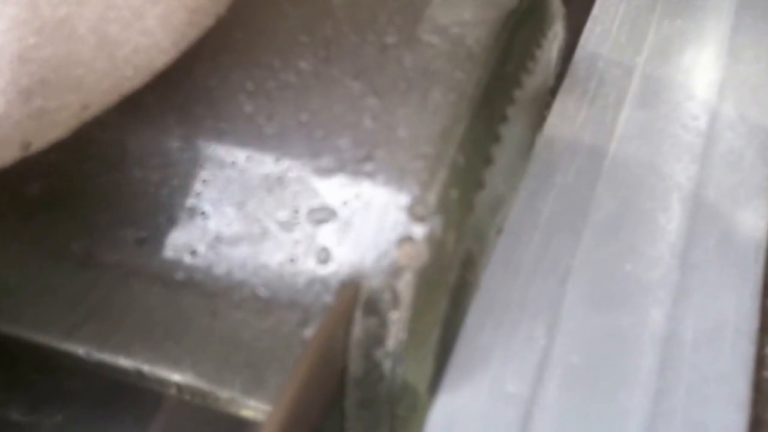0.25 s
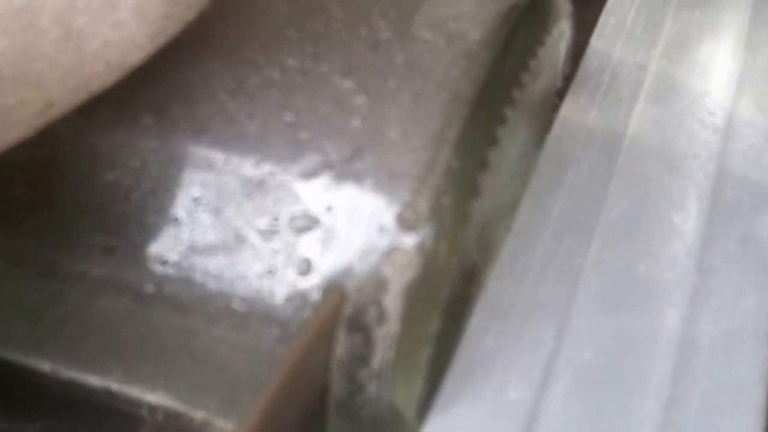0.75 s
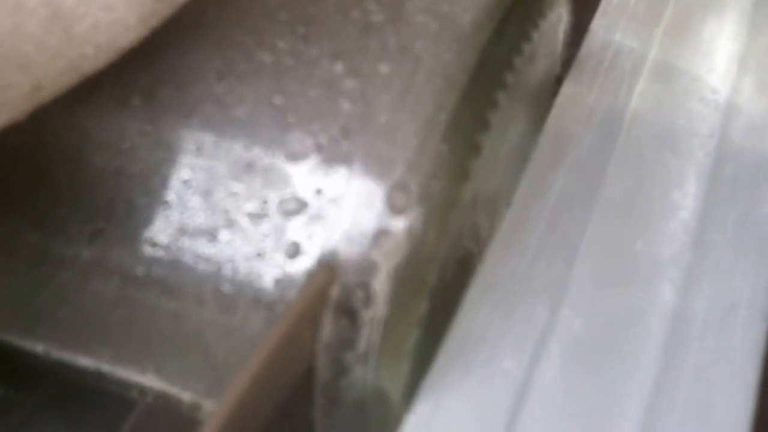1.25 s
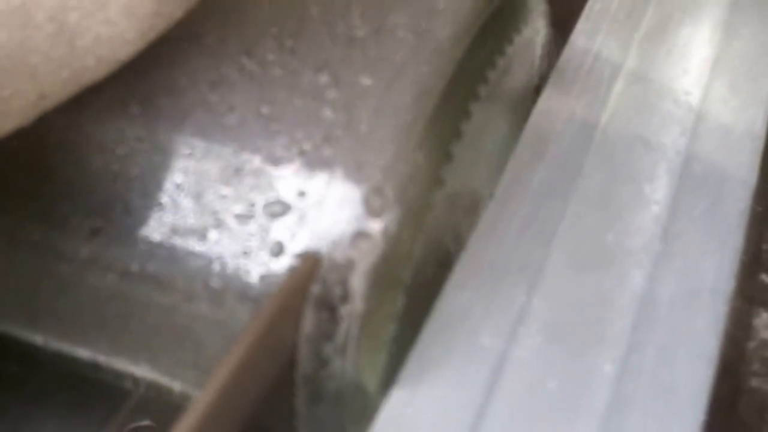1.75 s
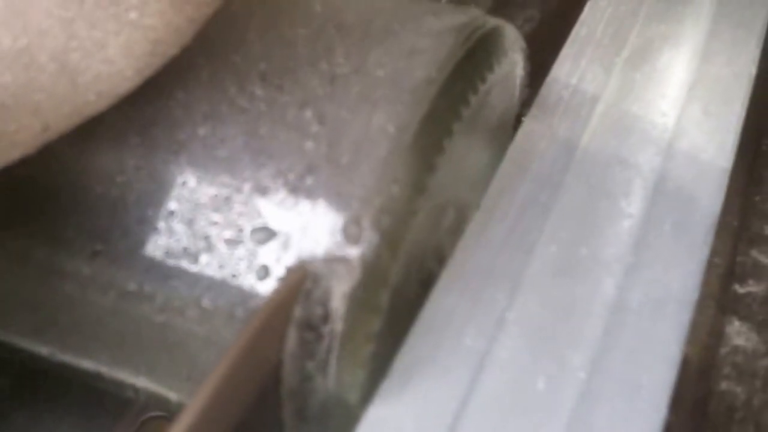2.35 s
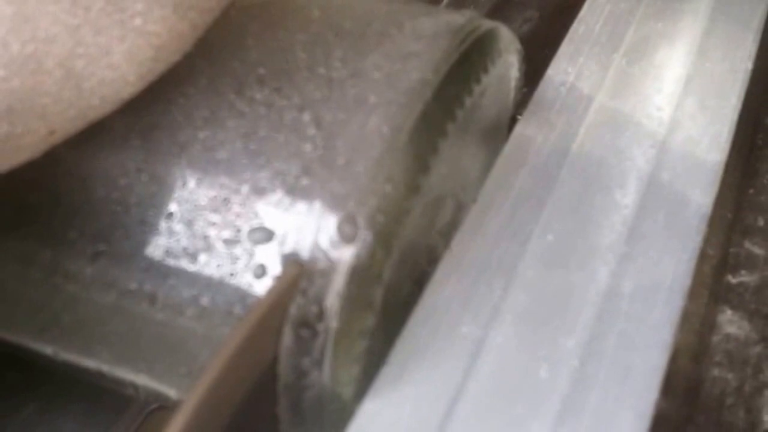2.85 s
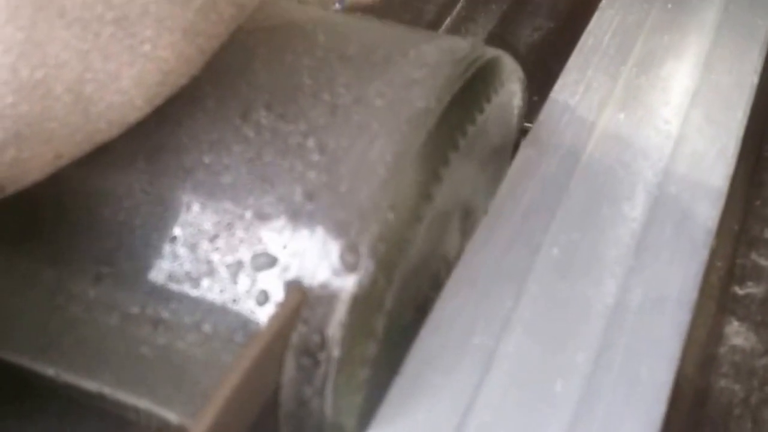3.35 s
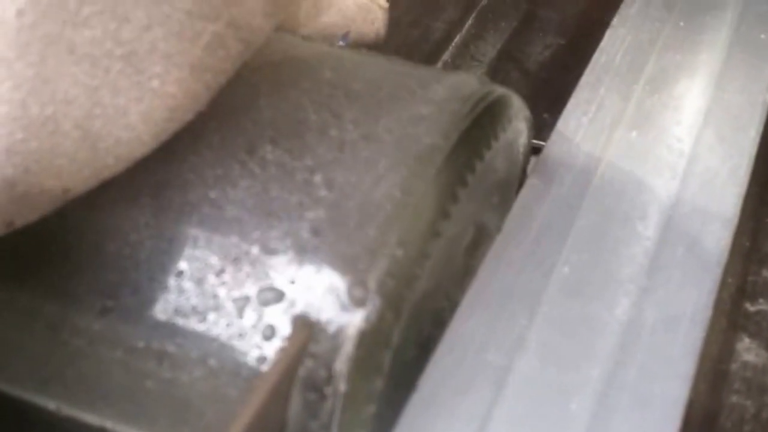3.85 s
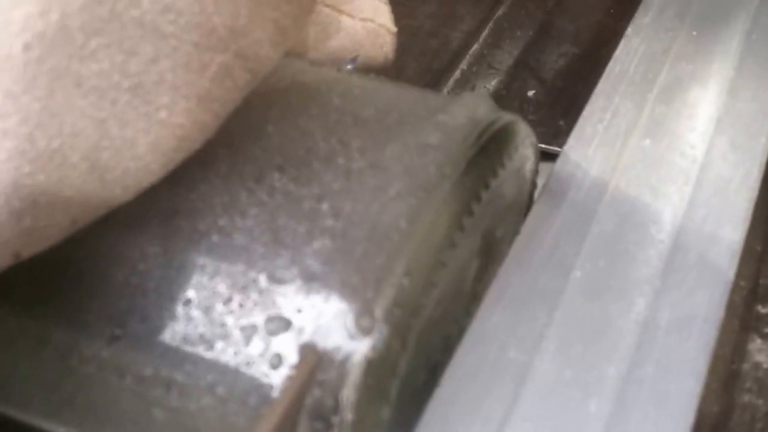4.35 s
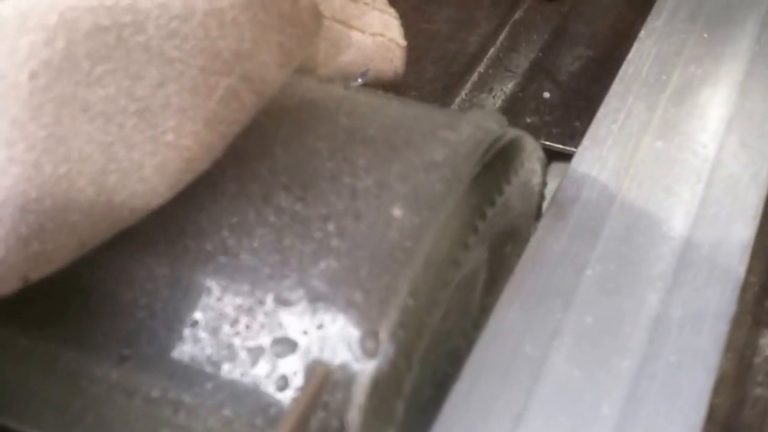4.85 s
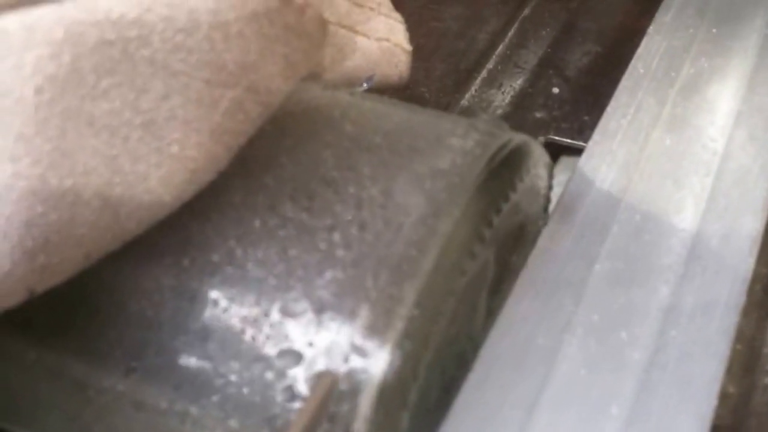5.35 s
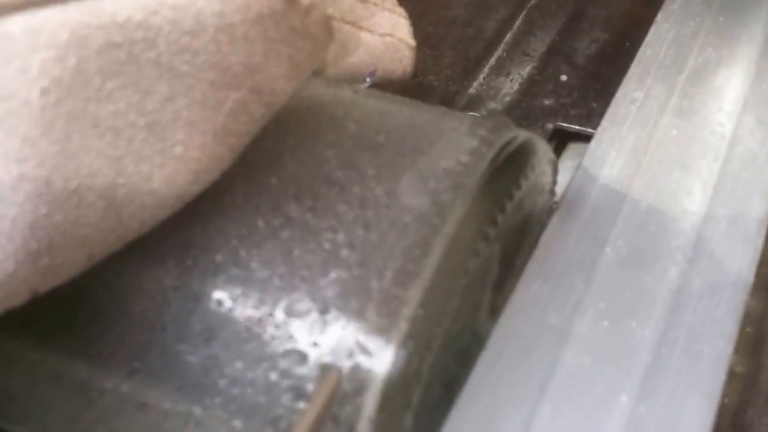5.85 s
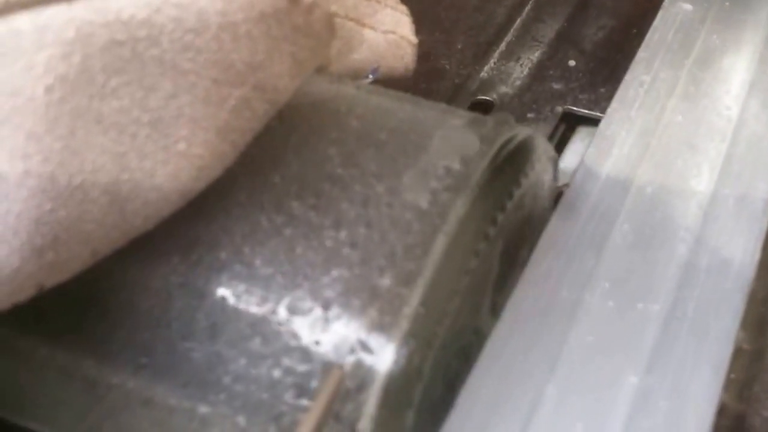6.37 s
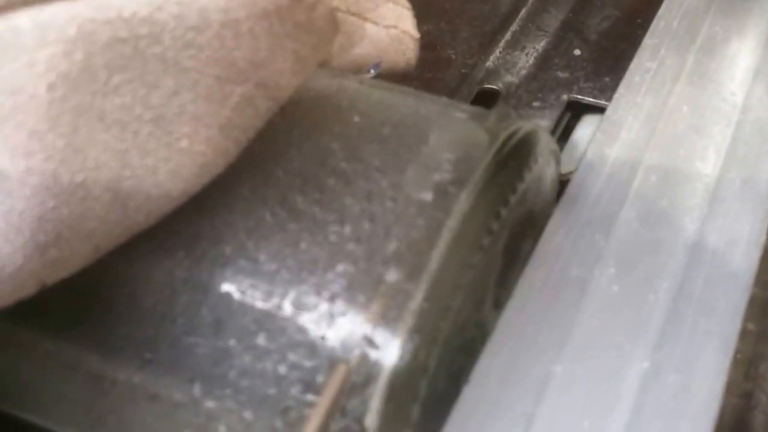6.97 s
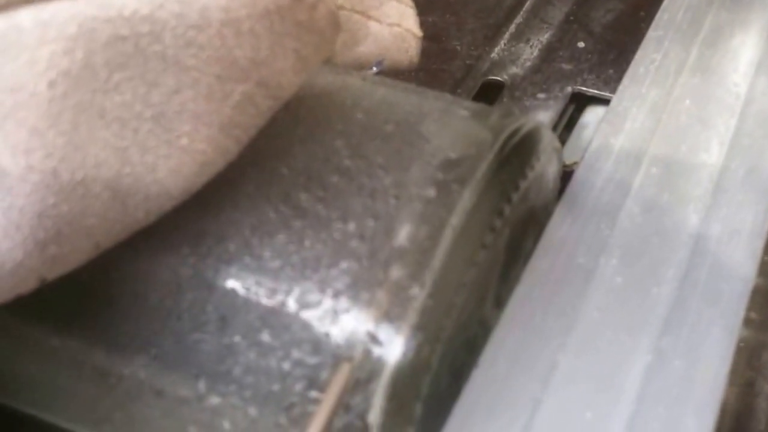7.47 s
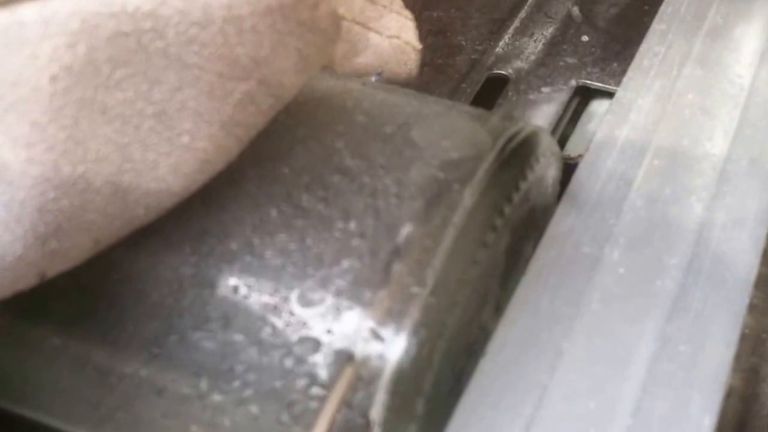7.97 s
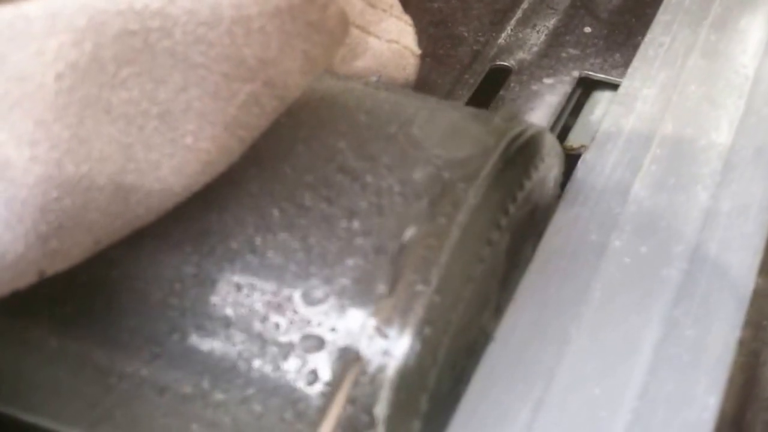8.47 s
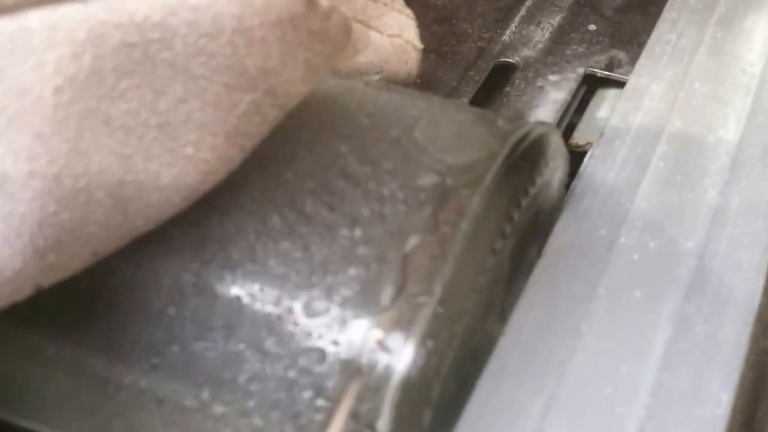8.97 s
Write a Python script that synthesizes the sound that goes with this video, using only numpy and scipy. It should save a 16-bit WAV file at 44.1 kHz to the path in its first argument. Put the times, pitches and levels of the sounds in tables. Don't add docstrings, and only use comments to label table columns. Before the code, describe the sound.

From 0 s a small wet saw is already grinding a glass bottle, very close, dry and mono, loud and slightly overdriven. The core is a harsh, rapidly buzzing grind repeating about sixty times a second, with glassy, metallic ringing strongest around 4-5 kHz and gritty hiss above. Thin steady whistles fade in and out, several in the first second. Irregular air gusts and short popping puffs strike the microphone, thickest before 2.5 s, returning around 3.4-4 s, then dying away. Around 3.5-5 s the whistles multiply and the grain becomes more regular. Near 5.3 s the grind eases slightly in level, and its buzz throbs more deeply and broadly. Brief bright surges come at about 6.35 and 6.7 s. From 6.8 to 8 s it whines on; at 8 s it brightens and pulses strongly, dulls near 8.65 s, and drops slightly after 9.1 s, still running. Faint low motor hum underlies everything.

```python
import sys
import numpy as np
from scipy import signal
from scipy.fft import rfft, irfft, next_fast_len
from scipy.io import wavfile
from scipy.ndimage import uniform_filter1d, map_coordinates

SR = 44100
rng = np.random.default_rng(int(sys.argv[2]) if len(sys.argv) > 2 else 0)


def transcribe(signal):
    frames = np.atleast_2d(signal).T
    limited = np.clip(frames, -1, 1)
    pcm = np.round(limited * 32767).astype(np.int16)
    wavfile.write(sys.argv[1], SR, pcm)


def rack_gain(trim_db):
    fader = np.asarray(trim_db, float)
    return 10 ** (fader / 20)


N = 406602

# time in seconds, pattern memory in turns, share of fresh chipping 0-1,
# depth of the once-a-turn throb 0-1.
RIM_STATE = [(0, 3.1, 0.28, 0.1), (.8, 2.8, 0.17, 0), (2, 3.5, 0.26, 0.03), (2.9, 1.3, 0.18, 0),
             (3.6, 9.3, 0.45, 0.12), (4.3, 7.3, 0.16, 0), (4.8, 21, 0.68, 0), (5.2, 11, 0.29, 0.26),
             (5.8, 16, 0.4, 0.32), (6.4, 2.1, 0.15, 0.38), (6.8, 9.8, 0.34, 0.08), (7.2, 15, 0.36, 0.26),
             (7.98, 7.7, 0.2, 0.16), (8.12, 15, 0.06, 0.56), (8.55, 10, 0.05, 0.46), (8.8, 8.5, 0.23, 0.3),
             (9.22, 3.5, 0.32, 0.25)]
# start in seconds, end in seconds.
CUT_STAGES = [
    (0, 1.8),
    (3.5, 4.6),
    (5.4, 6.2),
    (6.75, 7.9),
    (8.05, 9.22),
]
# low ring in dB and top hiss in dB, both against the bite,
# table rumble in dB, blade modes in dB.
STAGE_LEVELS = [
    (-10, -7.5, -37.5, 3.5),
    (-11, -8, -38.5, -0.3),
    (-9, -6, -42, 3.5),
    (-9.5, -5, -40.5, 0.5),
    (-7.5, -5.5, -39, -2),
]
# start in seconds, end in seconds,
# multiple of the shaft rate, level in dB.
WHISTLES = [(0, .76, 30, -26), (0, .86, 69, -17), (0, 2.4, 77, -23.5), (0, .7, 83, -23.5),
            (.6, 1.75, 81, -24.5), (0, 2.6, 44, -27), (.7, 1.26, 116, -28), (.8, 3.23, 19, -32.5),
            (1.16, 3.18, 118, -23), (1.4, 4.6, 30, -27), (1.72, 2.52, 81, -21.5), (1.72, 2.57, 142, -30),
            (1.8, 3.1, 65, -24), (1.8, 3.5, 67, -25), (2.3, 3.1, 66, -24.5), (2.55, 5, 44, -30.5),
            (2.67, 4.34, 29, -27), (3.48, 4.69, 69, -18.5), (3.73, 4.9, 81, -20), (3.73, 4.79, 142, -26),
            (3.78, 4.54, 52, -26), (3.78, 4.9, 56, -25), (4, 4.94, 91, -26.5), (4.2, 5.85, 121, -26),
            (4.34, 5.85, 84, -21), (4.64, 5.4, 34, -27.5), (4.7, 6.25, 99, -23.5), (6.25, 6.75, 99, -19.5),
            (4.74, 6.3, 134, -31.5), (5.15, 5.8, 66, -20.5), (5.15, 5.95, 92, -27), (5.2, 6.46, 122, -27.5),
            (5.5, 7.3, 63, -28.5), (5.75, 6.5, 64, -24), (6.7, 8.4, 94, -28), (6.85, 7.4, 99, -19),
            (7.35, 8.6, 99, -22), (6.8, 7.52, 143, -29.5), (6.86, 7.52, 111, -27.5), (6.7, 8.85, 29, -23.5),
            (8.4, 9.02, 58, -25), (7.4, 8, 19, -32), (7.83, 8.64, 105, -23.5), (8.2, 9.04, 57, -23.5),
            (7.93, 8.64, 87, -21.5), (8.03, 8.84, 52, -27.5), (8.03, 8.89, 85, -19), (8.08, 9, 79, -26.5),
            (8.4, 9.1, 86, -23)]
# start in seconds, end in seconds,
# multiple of the shaft rate, level in dB.
TABLE_HUMS = [(.3, .77, 4, -34), (.35, 1.06, 16, -39), (.9, 4.1, 8, -36), (.8, 1.36, 7, -37),
              (2.07, 3.3, 6, -38.5), (3.2, 4.6, 6, -36.5), (2.2, 3.13, 5, -38.5), (2.57, 3.28, 7, -40.5),
              (2.7, 3.23, 4, -40.5), (3.43, 4.6, 5, -39), (4, 5.14, 4, -38.5), (4.04, 4.6, 13, -42),
              (4.2, 5.45, 7, -43), (4.44, 6.4, 12, -43), (4.6, 6.4, 6, -41.5), (6.3, 9.3, 6, -39),
              (4.74, 5.3, 16, -38.5), (4.9, 5.85, 10, -43), (5.15, 8, 13, -42.5), (5.2, 9.3, 3, -43),
              (5.8, 6.95, 4, -42.5), (6.05, 7.37, 5, -44.5), (6.16, 8.1, 10, -41.5), (6.66, 7.87, 7, -44),
              (6.9, 9.04, 16, -40.5), (6.9, 8.13, 4, -37), (7.5, 8.6, 11, -42), (7.83, 8.55, 8, -36.5),
              (7.88, 8.9, 14, -39), (7.95, 8.94, 13, -38.5), (8.08, 9.15, 10, -39), (8.5, 9.3, 8, -32),
              (8.6, 9.3, 11, -38.5), (8.64, 9.3, 4, -36)]


def unit(x):
    return x / np.sqrt(np.mean(x ** 2) + 1e-20)


def along(points, hz):
    f, v = np.transpose(points)
    return np.interp(np.log(hz + 1), np.log(f + 1), v)


def curves(rows):
    s, *cols = np.transpose(rows)
    return [np.interp(np.arange(N) / SR, s, c) for c in cols]


def wobble(rate):
    knots = rng.standard_normal(int(N * rate / SR) + 4)
    return map_coordinates(knots, [np.arange(N) * rate / SR])


def bumps(times, lengths, sizes):
    t = np.arange(0, N, 64) / SR
    bells = np.exp(-((t[:, None] - times) / lengths) ** 2 / 2) @ sizes
    return np.interp(np.arange(N) / SR, t, bells)


def staged(values):
    return np.interp(np.arange(N) / SR, np.ravel(CUT_STAGES), np.repeat(values, 2))


def steady(x, span):
    return x / np.sqrt(np.abs(uniform_filter1d(x ** 2, int(span * SR))) + 1e-12)


def coloured(x, gain):
    m = 2 * next_fast_len(N // 2 + 4096)
    cepstrum = irfft(np.log(gain(np.fft.rfftfreq(m, 1 / SR)) + 1e-6), m)
    cepstrum[1:m // 2] *= 2
    cepstrum[m // 2 + 1:] = 0
    return irfft(rfft(x, m) * np.exp(rfft(cepstrum)), m)[:N]


def band(x, lo_hz, hi_hz):
    hz = np.fft.rfftfreq(N, 1 / SR)

    def edge(at):
        return .5 + .5 * np.tanh((hz - at) / (.04 * at))

    return unit(irfft(rfft(x) * edge(lo_hz) * (1 - edge(hi_hz)), N))


def singing(turns, rows, swell_s, waver_db, waver_rad, rate):
    sound = np.zeros(N)
    t = np.arange(N) / SR
    for start, end, order, db in rows:
        on = slice(max(round(start * SR), 0), min(round(end * SR), N))
        knots = rng.standard_normal((2, int(N * rate / SR) + 4))
        level, phase = (map_coordinates(row, [t[on] * rate]) for row in knots)
        swell = np.clip(np.minimum(t[on] - start, end - t[on]) / swell_s, 0, 1)
        sine = np.sin(2 * np.pi * round(order) * turns[on] + waver_rad * phase)
        sound[on] += swell * rack_gain(db + waver_db * level) * sine
    return sound


def puffing():
    # time in seconds, peak in dB.
    puff_list = [(0.002, -16), (0.02, -10), (0.291, -17), (0.358, -18), (0.371, -16), (0.403, -18),
                 (0.51, -18), (0.527, -16), (0.596, -16), (0.662, -16), (1.095, -19), (1.229, -19),
                 (1.379, -18), (1.535, -18), (1.561, -17), (1.591, -12), (1.608, -18), (1.792, -18),
                 (1.869, -16), (1.933, -15), (2.074, -15), (2.393, -19), (3.378, -14), (3.411, -16),
                 (3.547, -17), (3.805, -15), (3.819, -11), (3.887, -11)]
    t = np.arange(-300, 300) / SR
    puffs = np.zeros(N + len(t))
    for s, db in puff_list:
        u = t / rng.uniform(0.00038, 0.0006)
        flutter = np.sin(rng.uniform(5.3, 5.5) * u + rng.uniform(0, 6.4))
        push = u * np.exp(-u ** 2 / 2) + 0.11 * np.exp(-u ** 2) * flutter
        puffs[round(s * SR):][:len(t)] += rack_gain(db + 5.0) * rng.choice([-1, 1]) * push
    return puffs[len(t) // 2:][:N]


def wind():
    # frequency in Hz, level in dB per Hz.
    air_colour = [(12, -60), (59, -36), (136, -1), (472, -4), (1150, -10.5), (1500, -13), (1950, -45),
                  (3300, -120)]
    # time in seconds, peak in dB, length in seconds.
    gust_list = [(0, -37.5, 0.068), (.18, -41, 0.13), (.4, -35.5, .06), (.55, -37, 0.054),
                 (0.664, -35, .03), (0.856, -41, 0.068), (1.077, -40.5, 0.058), (1.186, -38, 0.039),
                 (1.42, -41.5, 0.13), (1.56, -33.5, 0.047), (1.843, -36, 0.1), (2.02, -44, 0.09),
                 (2.235, -34.5, 0.036), (2.376, -38.5, 0.04), (2.602, -42.5, 0.053), (2.81, -45, 0.039),
                 (3.4, -36.5, 0.045), (3.553, -39, 0.036), (3.81, -38.5, 0.032), (3.903, -39, 0.031),
                 (4.125, -41.5, 0.095), (4.347, -46, 0.082), (4.602, -57, 0.084), (4.844, -46, 0.048),
                 (4.995, -51, .04)]
    calm_db = -56
    lumps = rack_gain(0.7 * wobble(60) + 3.7 * wobble(200)) * rng.standard_normal(N)
    buffet = steady(coloured(lumps, lambda hz: rack_gain(along(air_colour, hz))), 0.118)
    s, peak_db, length = np.transpose(gust_list)
    strength = bumps(s, length, rack_gain(peak_db)) + rack_gain(calm_db)
    return rack_gain(8.5) * strength * buffet + puffing()


def motor(turns, pattern):
    # frequency in Hz, level in dB per Hz.
    table_colour = [(24, -83), (60, -66), (190, -19), (320, -9), (893, -10), (1100, -6), (1430, -28.5),
                    (2420, -120)]
    shake = 0.8 * pattern + 0.49 * rng.standard_normal(N)
    rumble = steady(coloured(shake, lambda hz: rack_gain(along(table_colour, hz))), 0.42)
    rumble_db = staged(np.transpose(STAGE_LEVELS)[2]) + 4.0
    hum = singing(turns, TABLE_HUMS, swell_s=0.12, waver_db=1.5, waver_rad=0.69, rate=7)
    return rack_gain(rumble_db) * rumble + rack_gain(0.3) * hum


def squeal(turns):
    return rack_gain(.8) * singing(turns, WHISTLES, swell_s=.1, waver_db=1.6, waver_rad=.7, rate=9)


def grit(turns, memory, knee_order, slip):
    cells = 744
    locked = .8
    count = int(turns[-1]) + 3
    fresh = rfft(rng.standard_normal((count, cells)), axis=1)
    life = np.interp(np.arange(count), turns, memory)[:, None]
    life = life * (1 + knee_order / (1 + np.arange(cells // 2 + 1)))
    kept = np.exp(-1 / np.abs(life))
    rim = [fresh[0]]
    for k in range(1, count):
        rim.append(kept[k] * rim[-1] + np.sqrt(1 - kept[k] ** 2) * fresh[k])
    rim = np.array(rim)
    free = np.ones(rim.shape)
    for start, end, order, _ in WHISTLES + TABLE_HUMS:
        ends = np.clip([round(start * SR), round(end * SR)], 0, N - 1)
        first, last = turns[ends].astype(int)
        free[first + 3:last, order] = 1 - locked
    surface = irfft(free * rim / np.abs(rim) ** 0.1, cells, axis=1).ravel()
    contact = (turns + 1) * cells + slip * wobble(30)
    return unit(map_coordinates(surface, [contact]))


def rim_force(pattern):
    share = np.clip(curves(RIM_STATE)[1], 0, 1)
    force = np.sqrt(1 - share) * pattern + np.sqrt(share) * rng.standard_normal(N)
    return force * rack_gain(1.04 * wobble(140) + 0.63 * wobble(25))


def runout(turns, depth):
    angle = 2 * np.pi * turns
    throb = depth * curves(RIM_STATE)[2]
    once = throb * (np.cos(angle) - 0.17 * np.sin(2 * angle))
    return 1 + once + 0.045 * np.cos(2 * angle + 0.3) + 0.049 * np.cos(3 * angle + 2.0)


def feed():
    # time in seconds, bite level in dB.
    pressure = [(0, -11), (2.2, -11.5), (2.6, -11.5), (3.6, -11.5), (5.2, -12.5), (5.5, -15), (6.2, -15),
                (7.6, -14.5), (8.4, -15), (8.75, -15), (9.22, -16)]
    # time in seconds, length in seconds, change in dB,
    # tilt in dB from the bottle's low ring toward the hiss.
    hand_moves = [(1.012, .04, -0.5, 1), (1.084, .03, 0.5, -1), (1.57, 0.043, 1.4, 2), (1.725, .04, -1, 0),
                  (1.818, 0.046, 1.4, 1.7), (1.99, 0.031, -0.5, -1), (2.495, 0.073, -0.7, 1),
                  (2.983, 0.097, -1.5, -1.5), (3.25, 0.028, 1.5, -0.5), (3.795, 0.036, 0.9, 2),
                  (4.003, .07, -0.1, -0.8), (4.451, 0.076, -0.5, -1), (5.27, 0.03, 0.7, 0.3),
                  (5.433, 0.048, -0.9, -0.7), (5.737, 0.071, 1, 1), (6.347, 0.0088, 2, 3.5),
                  (6.527, 0.059, -0.5, -0.5), (6.677, 0.015, 2.1, 3), (6.803, 0.069, -1.1, -2.5),
                  (7.238, 0.056, 0, 1), (7.353, 0.029, -1.5, 0), (7.479, 0.027, -1.5, -1.5),
                  (7.99, 0.055, 1, 3.5), (8.65, 0.081, -1.2, -3.5), (9.058, 0.028, 1.1, 3.5),
                  (9.129, 0.061, -2.5, -7)]
    low_follows, top_follows = 3.1, 0.83
    s, length, push, tilt = np.transpose(hand_moves)
    push_db = bumps(s, length, push)
    tilt_db = bumps(s, length, tilt)
    bite_db = curves(pressure)[0]
    low_db, top_db = map(staged, np.transpose(STAGE_LEVELS)[:2])
    return (bite_db + low_db + low_follows * push_db - tilt_db,
            bite_db + push_db,
            bite_db + top_db + top_follows * push_db + tilt_db)


def body(modes, dips, broad, broad_db):
    def gain(f):
        ring = sum(rack_gain(2 * db) * (f * w) ** 2 / ((c * c - f * f) ** 2 + (f * w) ** 2) for c, w, db in modes)
        hollow = np.prod([1 - min(d, 1) * np.exp(-((f - c) / w) ** 2) for c, w, d in dips], axis=0)
        return np.sqrt(ring + rack_gain(2 * (along(broad, f) + broad_db))) * hollow

    return gain


def cutting(turns, force):
    # frequency in Hz, width in Hz, level in dB.
    scoring = [(1093, 33, -9), (1800, 30, -9), (2417, 47, -13.5), (2614, 46, -10), (3275, 29, -14),
               (3900, 89, -1.5), (4098, 27, 0), (4590, 40, 0), (4810, 50, -1), (5000, 79, -4),
               (6090, 46, -5), (7010, 31, -2.5), (7187, 35, -2.5), (8400, 53, -5)]
    slotting = [(1116, 68, -13.5), (1760, 72, -7), (2605, 14, -11), (3300, 190, -7), (3830, 120, -5),
                (4100, 29.3, -3), (4820, 60, -.5), (4990, 70, -1.5), (5390, 47, -7), (5890, 60, -4),
                (6180, 49, -8), (7190, 43, -2), (7940, 59, -11.5), (8450, 50, -4)]
    piercing = [(1120, 103, -6.5), (1783, 120, -1.5), (2020, 19, -4), (2480, 100, -9), (3250, 270, -5),
                (3920, 220, 0.5), (4980, 89, 2.5), (5500, 28, -9), (5830, 46, 1.5), (7270, 120, -3),
                (8110, 80, -7)]
    widening = [(1120, 73, -8.5), (1750, 34, 1.5), (2480, 45, -11), (3085, 53, -5.5), (3350, 57, -1.5),
                (4000, 150, 2.5), (4930, 100, 2), (5500, 110, 1), (5866, 28, -3), (6200, 110, 0),
                (7130, 93, -4), (8440, 41, -4.5)]
    turning = [(1045, 36, -9), (1740, 50, -4), (2370, 90, -10), (3040, 84, -8.5), (3330, 50, -3),
               (3960, 31, -2.5), (4240, 65, -3), (5010, 83, 0.5), (5970, 120, -0.5), (5900, 36, -11.5),
               (7500, 30, -9), (8500, 32, -11.5)]
    # frequency in Hz, width in Hz, level in dB.
    disc_modes = [(9690, 33, -10.5), (11250, 84, -17), (12830, 78, -20), (14300, 70, -24)]
    # frequency in Hz, level in dB per Hz.
    grind_colour = [
        [(410, -54), (700, -48), (1310, -14.5), (1780, -3.5), (2160, -17), (2660, -18.5), (2910, -13),
         (4670, 3), (5450, -9), (7130, -9.5), (15000, -27)],
        [(410, -57), (700, -29), (1720, -8.5), (2190, -24), (2520, -7.5), (2830, -27.5), (3950, 3.5),
         (4920, -10), (6520, -9), (8640, -11.5), (15000, -23)],
        [(410, -44), (700, -14), (1000, -39), (1100, -4.5), (1510, -10.5), (1720, -4.5), (2800, -7.5),
         (3260, -8.5), (5040, -0.5), (9950, -11.5), (15000, -26.5)],
    ]
    # frequency in Hz, width in Hz, depth 0-1.
    hollows = [
        [(2250, 68, 0.1), (2920, 120, 0.37), (5330, 72, 0.7), (8200, 360, 0.3), (9640, 94, 0.4),
         (9800, 110, .5), (10600, 130, 1), (11300, 130, 0.74), (12200, 150, 0.5), (12900, 180, .6),
         (13400, 250, .6), (14570, 250, .95), (15400, 120, 1)],
        [(2850, 93, 0.32), (3500, 240, 0.01), (4490, 62, 0.34), (7800, 140, 0.14), (9380, 110, 0.7),
         (10000, 120, 0.9), (10870, 110, 0.5), (11140, 83, 0.4), (12700, 130, 0.7), (14000, 250, 0.8),
         (14780, 280, .9), (15560, 120, 0.7)],
    ]

    pressed = force * runout(turns, depth=0.52)
    sound = np.zeros(N)
    for k, bottle in enumerate([scoring, slotting, piercing, widening, turning]):
        blade_db = STAGE_LEVELS[k][-1]
        modes = bottle + [(hz, w, db + blade_db) for hz, w, db in disc_modes]
        gain = body(modes, hollows[min(k, 1)], grind_colour[min(k, 2)], broad_db=-7.0)
        share = staged(np.eye(len(CUT_STAGES))[k])
        sound += share * unit(coloured(pressed, gain))

    low_db, bite_db, top_db = feed()
    low = steady(band(sound, 950, 2900), .15)
    bite = steady(band(sound, 2900, 6500), .15)
    top = steady(band(sound, 6500, 16000), .15)
    return (rack_gain(low_db) * low * runout(turns, depth=0.13)
            + rack_gain(bite_db) * bite * runout(turns, depth=0.72)
            + rack_gain(top_db) * top * runout(turns, depth=0.23))


def scene():
    # time in seconds, shaft rate in Hz.
    shaft_rate = [(0, 59.49), (3.1, 59.48), (3.6, 59.4), (5.2, 59.49), (6, 59.41), (6.4, 59.27),
                  (7.6, 59.25), (8.3, 59.0), (8.85, 59.0), (9.22, 59.09)]
    turns = np.cumsum(curves(shaft_rate)[0]) / SR
    pattern = grit(turns, curves(RIM_STATE)[0], knee_order=13.5, slip=0.99)
    cut = cutting(turns, rim_force(pattern))
    return (cut + squeal(turns) + motor(turns, pattern) + wind())[None]


def thinned(x):
    # frequency in Hz, level in dB.
    threshold = [(6000, -21), (8000, -14), (9300, -10), (10500, -7), (12000, -5), (14000, -2.5), (15000, 2)]
    hz, _, z = signal.stft(x, SR, nperseg=2048)

    def smooth(v):
        return uniform_filter1d(uniform_filter1d(v, size=6, axis=0), size=2, axis=1)

    power = np.abs(smooth(np.abs(z) ** 2))
    waver_db = 4.5 * unit(smooth(smooth(rng.standard_normal(z.shape))))
    neighbours = uniform_filter1d(power, size=61, axis=0)
    heard = power > rack_gain(along(threshold, hz)[:, None] + waver_db) * neighbours
    kept = (heard | (hz < 6000)[:, None]) * (hz < 15250)[:, None]
    return signal.istft(z * kept, SR, nperseg=2048)[1][:N]


def top_cut(x):
    return signal.sosfilt(signal.butter(12, 15640, fs=SR, output="sos"), x)


def record(dry):
    clipped = dry / (1 + np.abs(dry / .9) ** 6) ** (1 / 6)
    bass_cut = signal.butter(2, 65, "high", fs=SR, output="sos")
    lean = signal.sosfilt(bass_cut, clipped[0])
    return top_cut(thinned(lean)[None])


dry = scene()
out = record(dry)
transcribe(out)
```